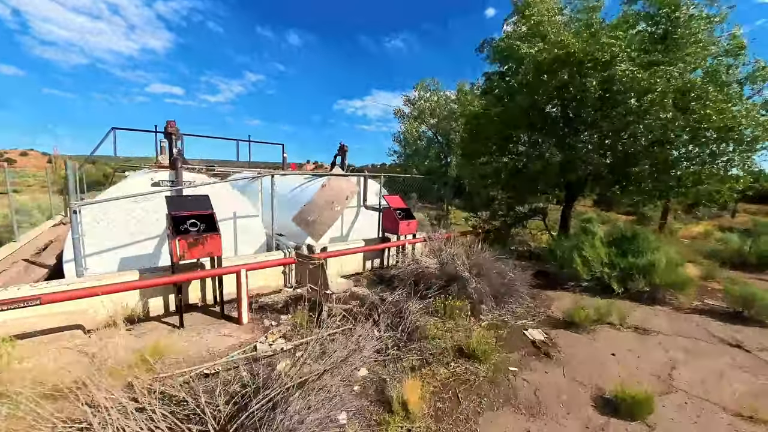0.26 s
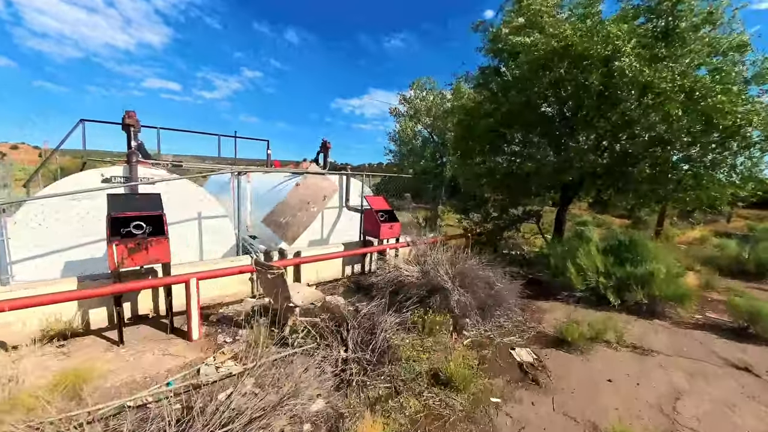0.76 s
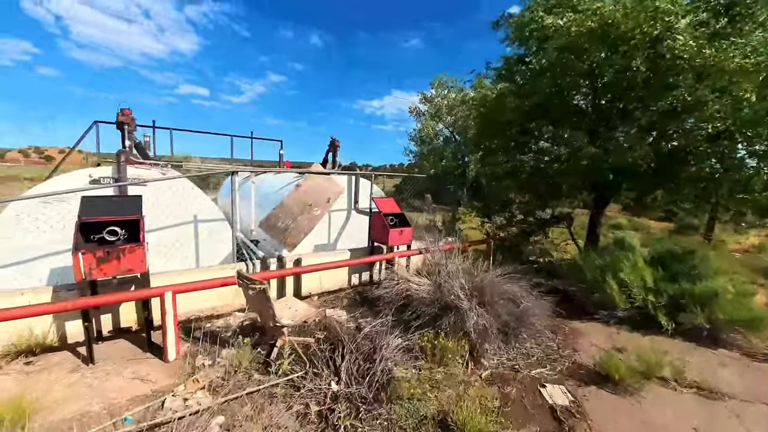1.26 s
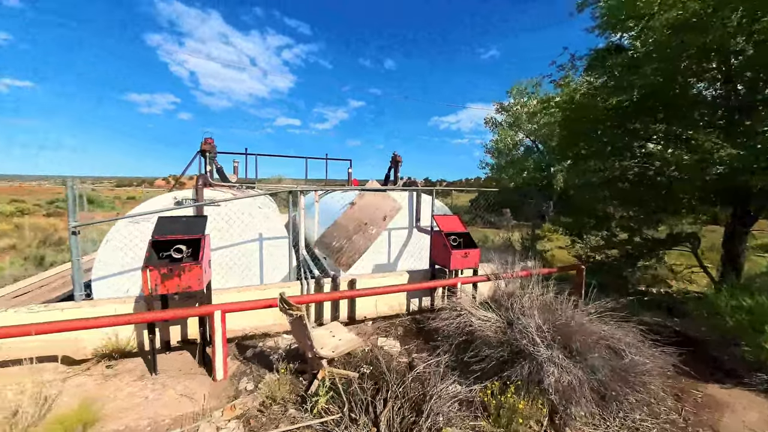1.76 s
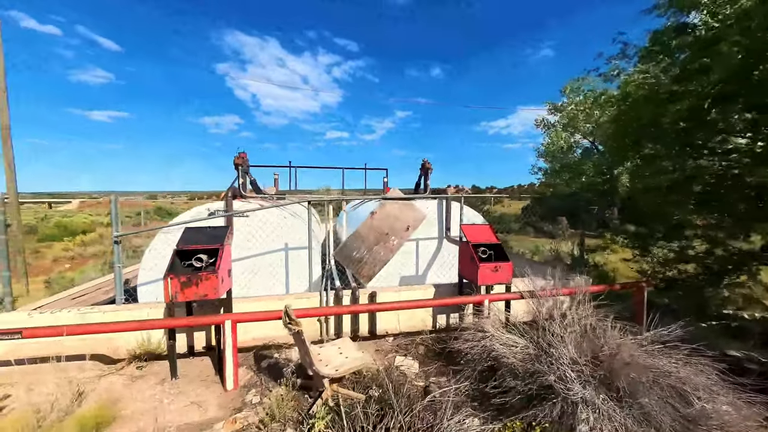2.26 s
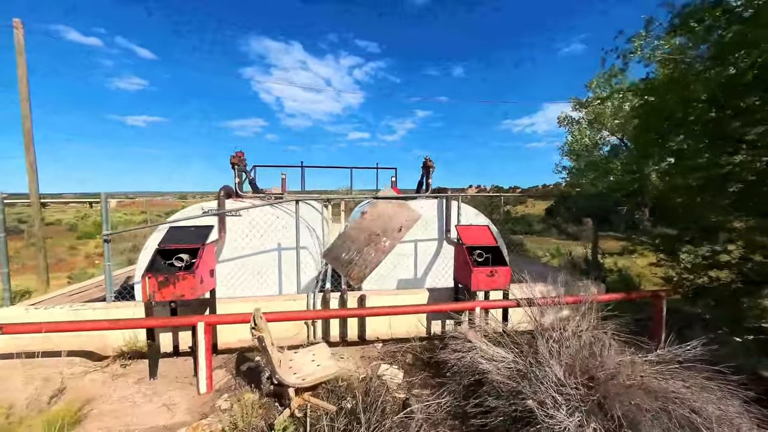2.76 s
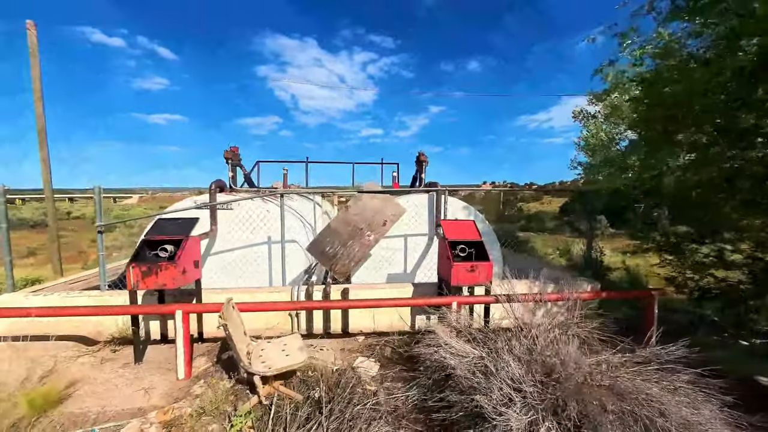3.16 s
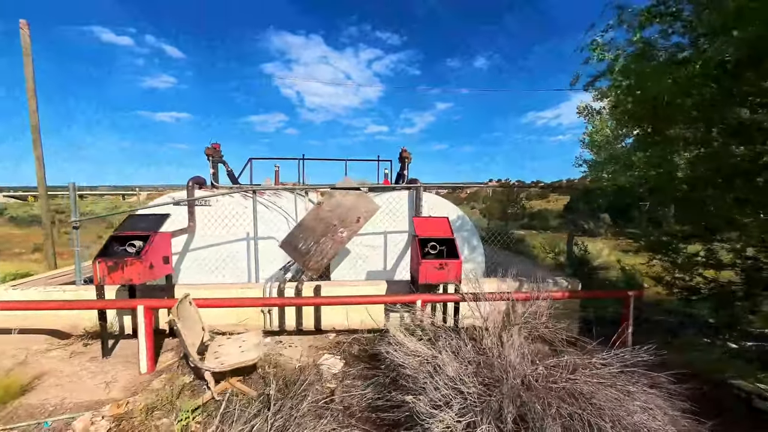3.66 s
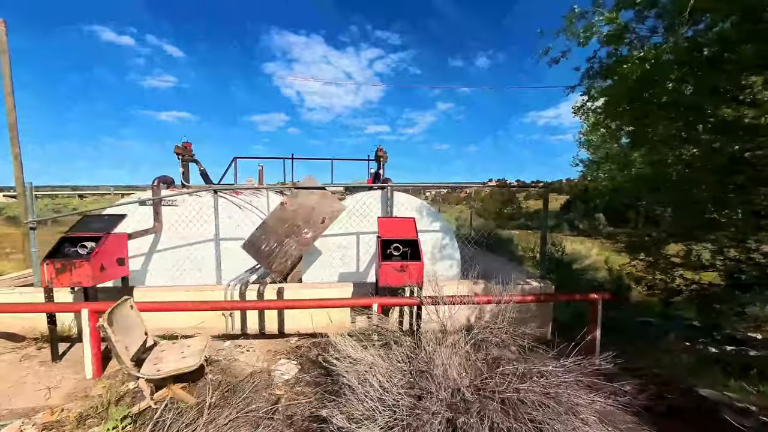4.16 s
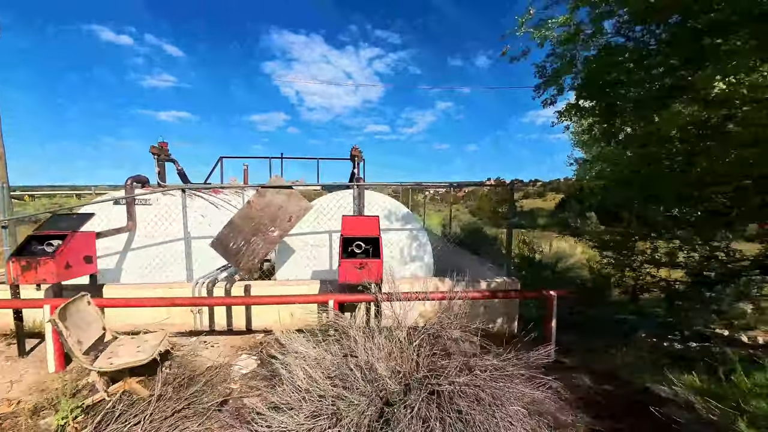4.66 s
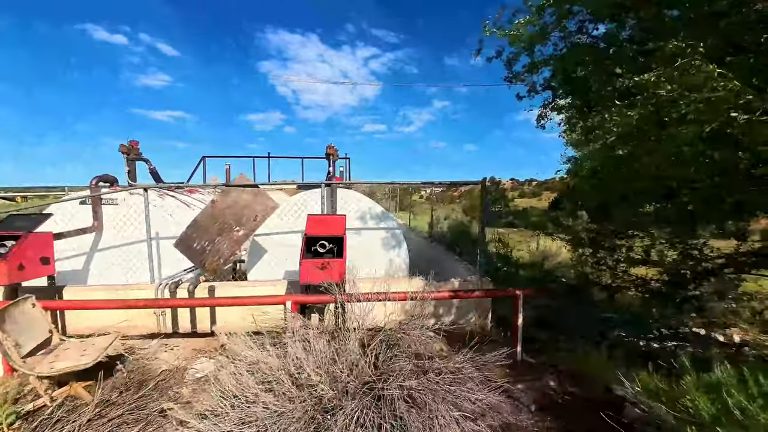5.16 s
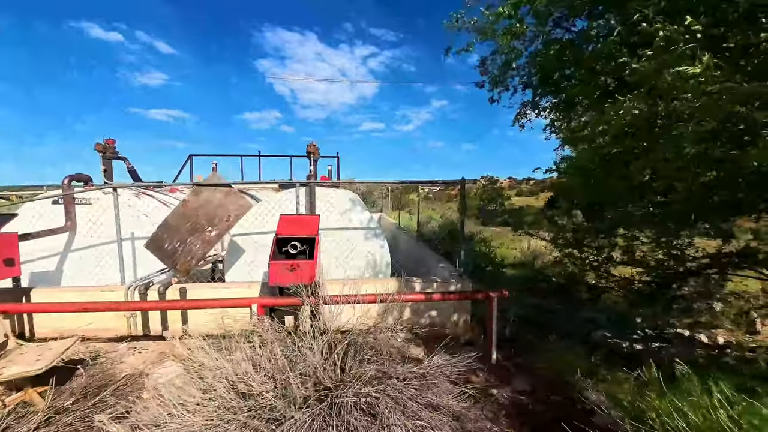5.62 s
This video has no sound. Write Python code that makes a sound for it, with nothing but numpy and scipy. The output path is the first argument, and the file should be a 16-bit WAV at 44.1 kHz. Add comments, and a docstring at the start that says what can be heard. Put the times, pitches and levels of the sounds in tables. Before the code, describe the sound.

Outdoors in open country, a distant highway drones steadily: a deep diesel truck hum that wavers and dips, blurred engines and a soft wash of tyres. Wind rumbles low on the microphone, gusty at first, calmer around the middle, then buffeting again with one hard thump near the end. Very quiet leaves rustle nearby, with small dry brush swishes and a few tiny twig ticks.

```python
"""A far highway drones across open country: the hum of a six-cylinder diesel truck over a wash of tyres.
The truck is a set of steady notes that sink slowly as it passes; their strength dips and rises.
Other engines and the tyres are shaped noise, swelling and dying away with the traffic.
Nearby, a breeze made of deep noise rumbles on the microphone; brighter noise rustles trees and dry brush."""
import sys
import numpy as np
from scipy import signal
from scipy.fft import rfft, irfft, next_fast_len
from scipy.io import wavfile
from scipy.ndimage import uniform_filter1d

SR = 44100
rng = np.random.default_rng(int(sys.argv[2]) if len(sys.argv) > 2 else 0)


def transcribe(u):
    """Save the signal u as a 16-bit wav file named by the first command-line argument.

    u: samples, shape (n,) or (channels, n), limited to [-1, 1]; the rate is SR.
    q: integer samples, one column per channel.
    """
    v = np.clip(np.atleast_2d(u).T, -1, 1)
    q = np.round(v * 32767).astype(np.int16)
    wavfile.write(sys.argv[1], SR, q)


N = 259749
TIME = np.arange(N) / SR  # seconds

# Truck: crankshaft speed as heard; it starts a little high and settles as the truck passes
CRANK_HZ, CRANK_EXCESS_HZ, SETTLE_S = 23.39, .98, 2.2
# Share of a note that arrives scattered, given at the firing rate (0-1); it grows steeply with pitch
SCATTER = 0.036
# Truck notes that swell and die away: (multiple of crankshaft speed, loudest t/s, half length/s, level/dB)
TRUCK_NOTES = [(3, 1.3, 6, -20.5), (6, 3, 3.8, -17.5), (8, 4.68, .17, -27.5), (9, .55, 0.4, -33),
               (9, 1.8, 1.2, -35), (9, 3.7, .6, -40), (11, 2.2, 1.4, -34.8), (12, .6, .45, -37.5),
               (12, 1.95, .9, -31), (12, 4.6, 0.42, -35), (13, 2.65, .6, -33.7), (13, 3.65, .45, -40)]
# Brief dips and rises in the strength of the truck's notes:
# (multiple of crankshaft speed, t/s, half length/s, change/dB)
NOTE_CHANGES = [(6, 0.13, 0.1, -7), (6, .48, 0.12, -13), (3, .46, 0.09, -7), (6, .84, .06, -6),
                (6, 1.53, 0.09, -4), (3, 1.58, .12, 2.5), (6, 1.78, 0.09, -9), (3, 2.25, 0.25, -7.5),
                (6, 2.5, .3, 1.3), (6, 2.93, 0.07, -5.5), (6, 3.38, 0.15, -3), (6, 4.02, .1, -1.5),
                (6, 4.46, .12, -5.5), (6, 4.75, .08, -4.5), (3, 4.7, 0.25, -5), (6, 5.1, 0.06, -4.5),
                (6, 5.43, .04, -7), (3, 5.72, .12, -7), (6, 5.84, 0.1, -6.5)]

# Other engines: loudest level, its moment, and how the level falls before and after it (dB per s squared)
DRONE_DB, DRONE_PEAK_S, DRONE_FALL_DB = -21.5, 1.3, -0.13
# Tone colour of the blurred engines: (f/Hz, relative level/dB per Hz)
DRONE_SPECTRUM = [(30, -16), (55, -3.5), (75, -2), (100, -0.5), (140, -1), (165, -0.6), (195, -1.5),
                  (235, -9), (300, -11), (350, -12), (410, -22.5), (900, -52.5)]

# Tyres: resting levels of the three layers
ROAR_DB, RUSH_DB, HISS_DB = -36, -36, -40
# Tone colours of the tyres, low to high: (f/Hz, relative level/dB per Hz)
ROAR_SPECTRUM = [(150, -20), (300, -7), (430, 1.5), (560, 2), (750, -2), (1000, -10), (1600, -27),
                 (4000, -61)]
RUSH_SPECTRUM = [(350, -23.5), (650, -3.5), (900, 1.2), (1150, -1.6), (1420, -8), (1700, -11), (2100, -17),
                 (3000, -21.5), (4000, -26.5), (6000, -37), (9000, -57), (12000, -77)]
HISS_SPECTRUM = [(600, -27), (900, -8), (1150, -1), (1420, -0.5), (1700, -6), (2100, -13.5), (3000, -24),
                 (6000, -55)]
# Waves and lulls in the traffic: (t/s, half length/s, roar change/dB, rush change/dB, hiss change/dB)
TRAFFIC_WAVES = [(.06, 0.08, 0, -1, 2.5), (.36, 0.11, -1, 1, 4), (.56, 0.15, 1.5, 3, 3.5),
                 (.88, 0.36, 4, 1.5, -1), (1.4, .25, -1, 0.5, -2.5), (1.63, 0.085, -3.5, 1.2, -1),
                 (2.82, 0.098, -2, 1.5, 3.5), (3.55, 0.16, 0, -3, -2.5), (3.87, 0.17, 5, -2, -2),
                 (4.55, 0.34, 3, 1, -2), (4.93, 0.27, 3, -3.5, 4.5), (5.62, 0.32, -1.5, -6, -1)]

# Leaves: resting level, starting level of their fine hiss, and its growth as the tree comes nearer
LEAVES_DB, FIZZ_DB, FIZZ_DB_PER_S = -51, -82.5, 2
# Tone colours of the leaves and their fine hiss: (f/Hz, relative level/dB per Hz)
LEAVES_SPECTRUM = [(700, -11.5), (1400, 5), (2100, 6), (3200, 0.5), (4200, -9), (5500, -17), (7000, -24),
                   (8500, -42), (11000, -48), (15000, -57.5)]
FIZZ_SPECTRUM = [(2000, -15), (4500, -9.5), (7000, 4), (9300, -3), (10500, -13), (13000, -19), (16000, -21)]
# Puffs of air stir the leaves: (t/s, half length/s, rustle change/dB, fine hiss change/dB)
LEAF_PUFFS = [(.6, 0.59, 5.5, -0.5), (1.25, 0.2, 2, 3), (1.98, 0.24, 5.5, -3.5), (2.72, 0.22, 3.5, -1),
              (4.35, 0.59, 6.5, -3), (4.76, 0.22, 3.5, 0), (4.98, 0.1, 6, -0.5), (5.35, 0.64, 1, 7),
              (5.55, .22, -1, -0.5)]
# Dry brush swishing: (t/s, half length/s, centre f/Hz, spread of the band with 1 = usual, level/dB)
BRUSH_SWISHES = [(1.37, .075, 4000, 1.4, -49.7), (1.86, .1, 2900, 1.2, -47.5), (1.862, .025, 3400, .9, -45),
                 (4.26, .04, 4200, 1.3, -54), (4.68, .035, 3900, 1.1, -49.3), (4.74, .06, 3200, 1.1, -47.5),
                 (5, .065, 3100, 1.4, -49.7), (5.25, .04, 3300, 1, -51)]
# Tone colour of a swish: (multiple of its centre frequency, relative level/dB per Hz)
STEM_SPECTRUM = [(.3, -20), (.6, -5), (.87, -3.5), (1, 0), (1.08, -3), (1.18, -11), (1.5, -21), (1.9, -44)]
# Dry twigs ticking: (t/s, rough peak level/dB, upper edge f/Hz, decay/s)
TWIG_TICKS = [(1.375, -37, 5000, .004), (2.22, -54, 8000, .002), (3.35, -45, 8000, .002),
              (3.981, -58, 8000, .002), (4.494, -41, 10000, .0015)]

# Tone colour of the breeze's rumble: (f/Hz, relative level/dB per Hz)
WIND_SPECTRUM = [(10, -15.5), (20, -4), (32, -1), (42, -8), (55, -8), (72, -14.5), (130, -19.5),
                 (250, -37.5), (600, -61)]
# Strength of the breeze, before a fixed lift in wind(): (t/s, level/dB)
BREEZE_STRENGTH = [(0, -20), (.55, -20.5), (.85, -24), (1.45, -20.5), (1.75, -24.5), (2.6, -26.5),
                   (3.3, -28), (4, -25.5), (4.4, -20), (5.3, -22.5), (5.89, -17.5)]
# Pressure of the slowest eddies: (f/Hz, relative level/dB per Hz)
SURGE_SPECTRUM = [(3, -27.5), (7, -9), (11, 2.5), (16, -3), (24, -13.5), (60, -48.5)]
# Strength of the slowest eddies: (t/s, level/dB)
SURGE_STRENGTH = [(0, -13.5), (.9, -18.5), (1.7, -20), (2.9, -19.5), (3.3, -15.5), (4.1, -20), (4.35, -16),
                  (5.2, -13.5), (5.55, -21), (5.8, -10.5)]
# Deep buffet of a gust: (f/Hz, relative level/dB per Hz)
BUFFET_SPECTRUM = [(10, -21.5), (20, -1), (28, 2.5), (38, -5), (55, -10), (100, -31), (300, -58)]
# Gusts that buffet the microphone: (t/s, half length/s, level/dB)
WIND_GUSTS = [(0.113, 0.046, -13.5), (0.416, 0.099, -11.5), (0.583, 0.043, -8.5), (2.864, 0.12, -21),
              (3.23, 0.037, -18), (3.445, 0.045, -12), (4.343, 0.062, -13), (5.053, 0.031, -10),
              (5.144, .05, -13), (5.335, 0.084, -10.5), (5.705, 0.049, -10.5)]
# Eddies that thump the microphone: (t/s, half length/s, level of the push/dB before peaks are rounded)
WIND_THUMPS = [(5.4064, 0.0017, 1.5)]
# Suction before a thump's push and slow release after it: (delay/s, half length/s, share of the push)
THUMP_SIDES = [(-.003, .0016, -.55), (.005, .004, .1)]

EDGE_HZ = 15700  # upper limit of the whole sound


def truck():
    """The diesel fires three times a turn; unequal cylinders add the notes in between."""
    crank_hz = CRANK_HZ + CRANK_EXCESS_HZ * np.exp(-TIME / SETTLE_S)
    crank_turns = np.cumsum(crank_hz) / SR
    out = np.zeros(N)
    for multiple, s, half, db in TRUCK_NOTES:
        change_db = sum(change * swell(at, width) for which, at, width, change in NOTE_CHANGES if which == multiple)
        scatter = SCATTER * (multiple / 3) ** 1.55
        note = far_note(multiple * crank_turns, scatter, rate=4)
        out += gain_of(db + change_db) * swell(s, half) * note
    return out


def far_note(turns, scatter, rate):
    """A steady note plus a scattered share, so that its strength and phase wander."""
    path = evened(1 + scatter * (drift(rate) + 1j * drift(rate)))
    wave = path * np.exp(2j * np.pi * (turns + rng.random()))
    return np.sqrt(2) * wave.real


def far_engines():
    """The engines of many other vehicles blur into one low drone that swells a little, then recedes."""
    level_db = DRONE_DB + DRONE_FALL_DB * (TIME - DRONE_PEAK_S) ** 2
    return gain_of(level_db) * steadied(noise(DRONE_SPECTRUM), size=1500)


def tyres():
    """Many tyres merge into a low roar, a higher rush and a hiss that surges when the air carries it."""
    roar_db, rush_db, hiss_db = swells_db(TRAFFIC_WAVES)
    roar = gain_of(ROAR_DB + roar_db) * through_air(noise(ROAR_SPECTRUM), patchy_db=0.5)
    rush = gain_of(RUSH_DB + rush_db) * through_air(noise(RUSH_SPECTRUM), patchy_db=1.0)
    hiss = gain_of(HISS_DB + hiss_db) * through_air(noise(HISS_SPECTRUM), patchy_db=1.5)
    return roar + rush + hiss


def foliage():
    """Moving air stirs leaves and dry stems, and now and then a twig ticks."""
    return leaves() + dry_brush() + twigs()


def leaves():
    """Countless leaves brushing together blend into a rustle and a finer, flickering hiss."""
    rustle_db, puff_fizz_db = swells_db(LEAF_PUFFS)
    rustle = gain_of(LEAVES_DB + rustle_db) * through_air(noise(LEAVES_SPECTRUM), patchy_db=2.5)
    fizz_db = FIZZ_DB + FIZZ_DB_PER_S * TIME + puff_fizz_db + 1.2 * drift(14)
    return rustle + gain_of(fizz_db) * noise(FIZZ_SPECTRUM)


def dry_brush():
    """Stems catch and slip on each other, which roughens each swish."""
    out = np.zeros(N)
    for s, half, hz, spread, db in BRUSH_SWISHES:
        stems = noise([(hz * multiple ** spread, level) for multiple, level in STEM_SPECTRUM])
        catching_db = 1.6 * drift(90)
        out += gain_of(db + catching_db) * swell(s, half) * stems
    return out


def twigs():
    """A twig's snap is a burst of noise that starts abruptly and dies away fast."""
    out = np.zeros(N)
    for s, db, hz, decay in TWIG_TICKS:
        snap = noise([(500, -10), (1500, 0), (hz, -2), (1.6 * hz, -14), (1.9 * hz, -38)])
        rise = np.clip((TIME - s) / .0004, 0, 1)
        fall = np.exp(-abs(TIME - s) / decay)
        out += gain_of(db - 8.0) * snap * rise * fall  # the noise's average is set 8 dB below the rough peak
    return out


def wind():
    """Eddies push on the microphone: slow surges, a rumble, gusts, and a thump when one breaks on it."""
    surge_db, breeze_db = curve(SURGE_STRENGTH)[0], curve(BREEZE_STRENGTH)[0]
    out = gain_of(surge_db) * steadied(noise(SURGE_SPECTRUM), size=6000)
    out += gain_of(breeze_db + 2.5) * steadied(noise(WIND_SPECTRUM), size=3500)
    gust_gain = sum(gain_of(db) * swell(s, half) for s, half, db in WIND_GUSTS)
    out += gust_gain * steadied(noise(BUFFET_SPECTRUM), size=2500)
    for s, half, db in WIND_THUMPS:
        sides = sum(share * swell(s + delay, width) for delay, width, share in THUMP_SIDES)
        push = swell(s, half) + sides
        others = (1 - swell(s, 10 * half)) ** 2  # the breaking eddy displaces the others
        out = out * others + gain_of(db) * push
    return out


def gain_of(db):
    """Turns decibels into a plain multiplier."""
    return 10 ** (np.asarray(db) / 20)


def evened(x):
    """Scales a signal to an average (rms) strength of 1."""
    return x / np.sqrt(np.mean(abs(x) ** 2) + 1e-20)


def steadied(x, size):
    """Evens out a noise's strength over size samples, so that its level curve alone shapes it."""
    return x / np.sqrt(uniform_filter1d(x ** 2, size=size) + .05)


def curve(rows):
    """Draws straight lines between the rows of a time table, one curve per column."""
    s, *columns = np.transpose(rows)
    return [np.interp(TIME, s, c) for c in columns]


def swell(s, half):
    """A smooth rise and fall around a moment."""
    return np.exp(-((TIME - s) / half) ** 2)


def swells_db(rows):
    """Adds overlapping swells into one level change per dB column."""
    return sum(np.outer(changes, swell(s, half)) for s, half, *changes in rows)


def drift(rate):
    """Random wandering of rms 1: a sum of sine waves of up to rate cycles a second."""
    t = TIME[::128]
    speeds = rate * np.geomspace(1 / 10, 1, num=24)
    starts = rng.random((len(speeds), 1))
    waves = np.sin(2 * np.pi * (speeds[:, None] * t + starts))
    return np.interp(TIME, t, evened(waves.sum(0)))


def noise(points):
    """Noise of rms 1 with the given tone colour."""
    size = next_fast_len(N)
    f, db = np.transpose(points)
    log_f = np.log(np.fft.rfftfreq(size, 1 / SR) + 1e-3)  # the small offset avoids log(0)
    shape = gain_of(np.interp(log_f, np.log(f), db, right=-120))
    return evened(irfft(rfft(rng.standard_normal(size)) * shape, size)[:N])


def through_air(x, patchy_db):
    """Turbulence lets patches of the spectrum come and go."""
    z = signal.stft(x, nperseg=1024, noverlap=768)[2]
    patches = uniform_filter1d(rng.standard_normal(z.shape), size=8, axis=0)  # smooth over frequency
    patches = uniform_filter1d(patches, size=26, axis=1)  # smooth over time
    z = z * gain_of(patchy_db * evened(patches))
    return evened(signal.istft(z, nperseg=1024, noverlap=768)[1][:N])


def scene():
    """Highway far off, breeze close by."""
    return (truck() + far_engines() + tyres() + foliage() + wind())[None]


def record(dry):
    """The strongest gusts round off at full scale; then the highest treble is cut."""
    rounded = dry / (1 + dry ** 16) ** (1 / 16)
    low_pass = signal.firwin(511, EDGE_HZ, window=("kaiser", 9), fs=SR)
    return signal.oaconvolve(rounded, low_pass[None], "same")


dry = scene()
out = record(dry)
transcribe(out)
```